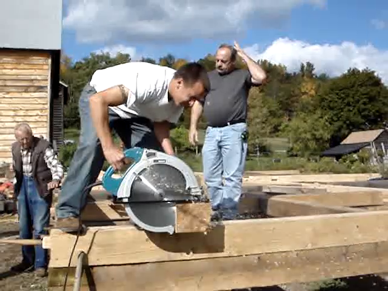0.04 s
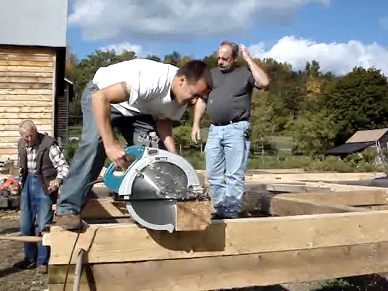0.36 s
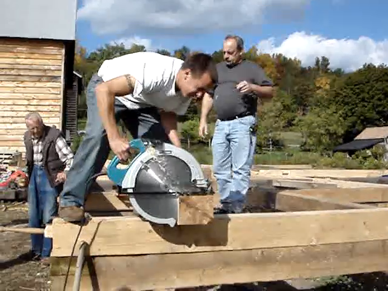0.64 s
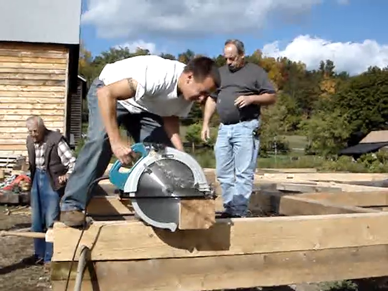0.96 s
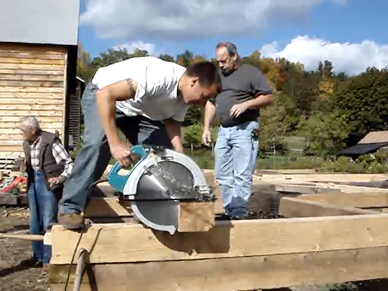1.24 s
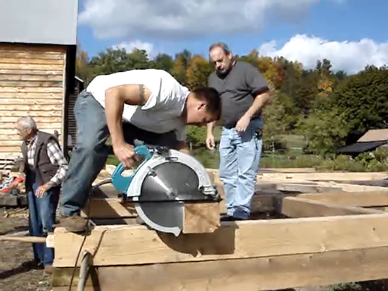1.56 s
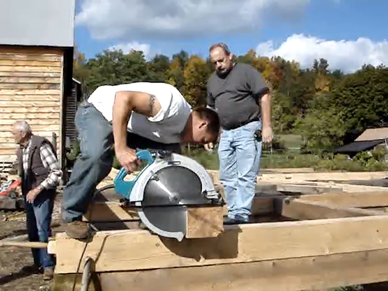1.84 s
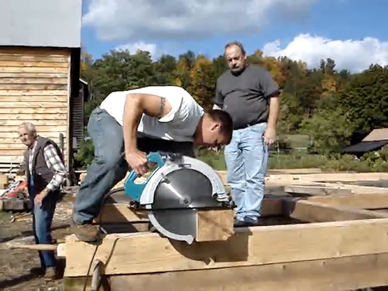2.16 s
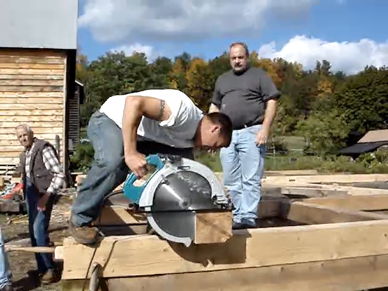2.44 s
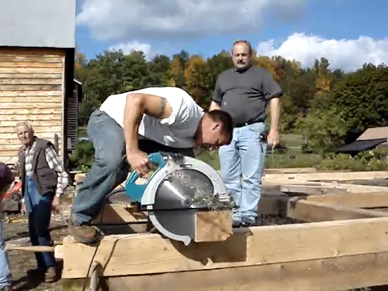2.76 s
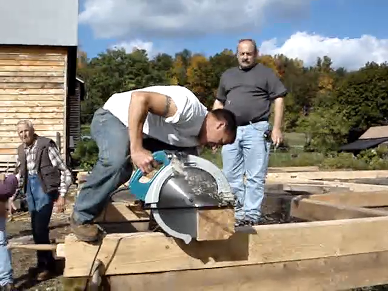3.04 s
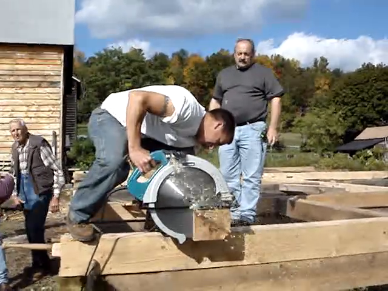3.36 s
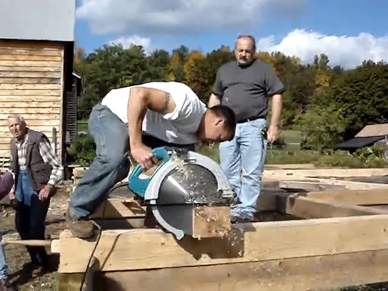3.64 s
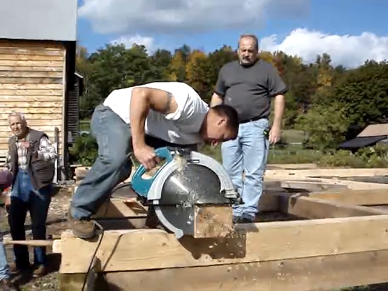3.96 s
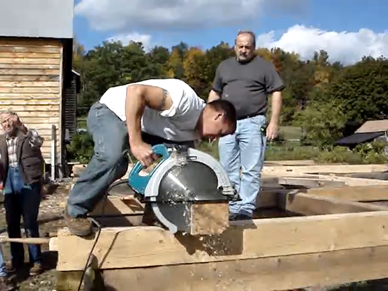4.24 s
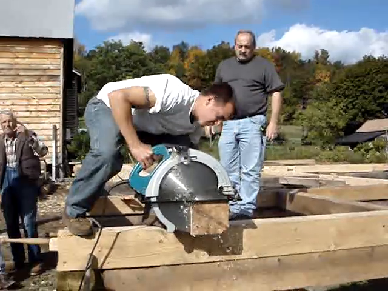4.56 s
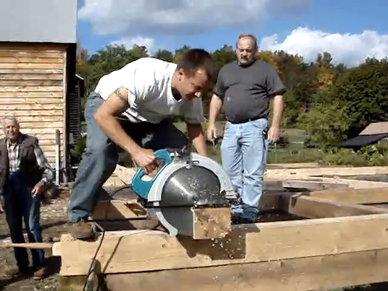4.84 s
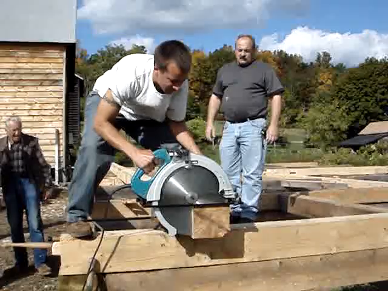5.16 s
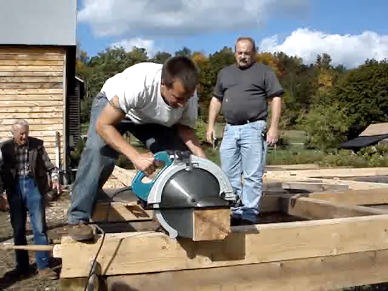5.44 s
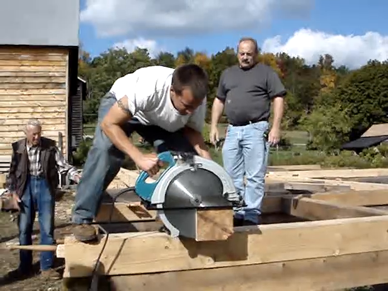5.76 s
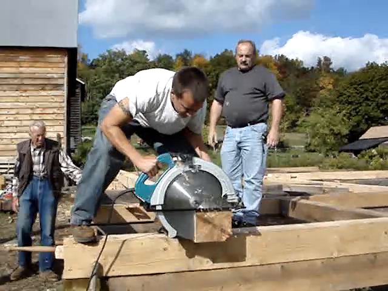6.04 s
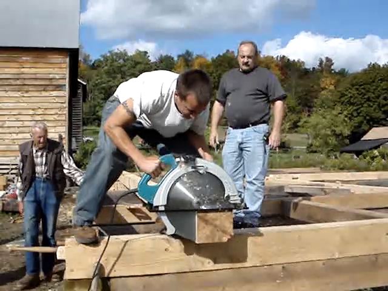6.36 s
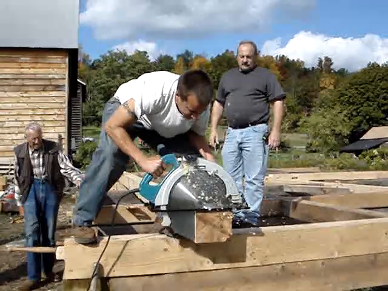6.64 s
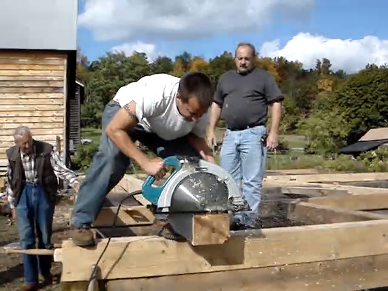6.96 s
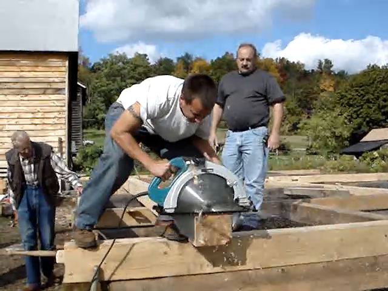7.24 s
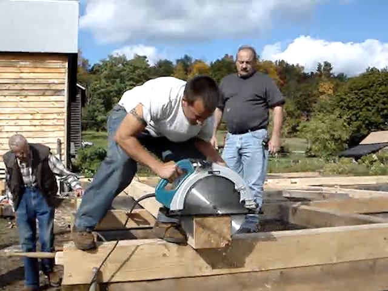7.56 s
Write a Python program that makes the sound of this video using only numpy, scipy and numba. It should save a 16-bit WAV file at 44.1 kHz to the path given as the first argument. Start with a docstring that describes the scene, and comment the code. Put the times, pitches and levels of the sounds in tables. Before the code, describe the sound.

A large circular saw cuts through a thick timber beam outdoors, a few metres from the microphone. Its motor whine sags and recovers several times over a loud roar, with tearing wood, hissing teeth and a ringing blade. Midway the motor labours with a buzzing hum, speeds up, then slows again. Brief whistles and rasps come through, and wind bumps the microphone, mostly early on.

```python
"""A big circular saw whines and roars through a timber beam, outdoors, a few metres away.
Its mains motor sags as the teeth bite; gears and fan whine, torque pulses throb in the beam.
The teeth tear and hiss, the blade rings, the saw briefly whistles and rasps. Gusts bump the microphone.
Later the air in the slot rings, mostly lower as the cut deepens."""
import sys
import numpy as np
from scipy import signal
from scipy.fft import rfft, irfft
from scipy.io import wavfile
from scipy.ndimage import uniform_filter1d
from numba import njit

SR = 44100
rng = np.random.default_rng(int(sys.argv[2]) if len(sys.argv) > 2 else 0)


def put_to_file(sound):
    """Save the sound as 16-bit audio at rate SR, in the file named by the first command-line argument."""
    columns = np.atleast_2d(sound).T  # one column per channel
    safe = np.clip(columns, -1, 1)
    whole_steps = np.round(safe * 32767)
    wavfile.write(sys.argv[1], SR, whole_steps.astype(np.int16))


N = 335160
TIME, FREQ = np.arange(N) / SR, np.fft.rfftfreq(N, 1 / SR)
MAINS_HZ = 60
TORQUE_HZ = 2 * MAINS_HZ

# Table levels are relative; each source adds its own gain.
ARMATURE_SPEED = [(0.0, 414.8), (0.15, 413.1), (0.62, 387.5), (1.04, 352.0), (1.24, 327.4), (1.37, 320.2),
                  (1.67, 327.1), (2.1, 360.5), (2.38, 360.8), (2.93, 286.9), (3.09, 282.2), (3.71, 269.3),
                  (4.06, 243.8), (4.32, 258.5), (4.65, 260.1), (4.9, 300.0), (5.5, 355.0), (5.69, 351.0),
                  (5.98, 333.5), (6.36, 337.5), (6.67, 319.4), (6.91, 288.6), (7.44, 263.7), (7.6, 258.5)]  # sags at each push: t/s, speed/Hz
MOTOR_LABOUR = [(3.45, 0.01), (3.75, .55), (4.02, .86), (4.25, .98), (4.55, .9), (4.7, 0.4), (5.1, .2)]  # t/s, labour/0-1
# gear case resonances: f/Hz, width/Hz, lift/dB
GEAR_CASE_PEAKS = [(988, 33, 7), (1278, 194, 10.5), (1409, 56, 11.5), (2867, 90, 12.5), (3160, 160, 9)]
# housing resonances: f/Hz, width/Hz, lift/dB
HOUSING_PEAKS = [(2470, 210, 2.5), (2683, 71, 7), (3080, 220, 3), (4700, 120, 4), (4930, 110, 3.5),
                 (7100, 220, 5)]
# armature, fan and tooth tones: multiple of armature speed, level/dB
WHINE_TONES = [(3, -48), (4, -48), (6, -52), (7.5, -56), (8, -51), (9, -51), (10, -49.5), (10.5, -50),
               (11, -47), (11.5, -46), (11.75, -50), (12, -44), (13, -51), (13.75, -54), (14, -47.5),
               (15, -50), (16, -45), (17, -50), (18, -45), (20, -46)]
# blade binds, one tone swells: t/s, sigma/s, multiple of armature speed, level/dB
BIND_SWELLS = [(.53, .11, 12, -28), (.9, .06, 16, -33), (2.22, .12, 13.75, -33), (.58, .06, 18, -34),
               (1.2, .07, 16, -35), (1.84, .07, 18, -32), (2.3, .2, 14, -36), (2.87, .05, 18, -32),
               (2.92, .07, 14, -34), (3, .13, 12, -31), (3.2, .13, 10, -37), (3.22, .09, 16, -30),
               (3.45, .08, 15, -33), (3.45, .12, 9, -39), (3.48, .11, 18, -28.5), (3.63, .08, 16, -30),
               (3.7, .1, 14, -32), (3.78, .08, 10, -36), (3.92, .09, 12, -26.5), (4.28, .06, 10, -31.5),
               (4.33, .13, 14, -34.5), (4.45, .08, 16, -35), (4.71, .05, 10, -33), (4.75, .12, 7.5, -39),
               (4.8, .1, 8, -38), (4.86, .11, 12, -34), (4.92, .06, 11, -34), (5.1, .08, 10, -33.5),
               (5.2, .14, 10.5, -36), (5.3, .14, 11.5, -32), (5.33, .08, 11.75, -34),
               (5.44, .07, 10, -30.5), (5.7, .12, 16, -37), (5.88, .08, 11.5, -33), (6.15, .1, 18, -35),
               (6.25, .18, 14, -34), (6.3, .2, 8, -36), (6.42, .12, 16, -32), (6.7, .05, 16, -35),
               (6.72, .12, 6, -36), (6.76, .08, 8, -30.5), (6.9, .05, 12, -33), (7, .12, 11, -35),
               (7.45, .16, 4, -34)]
# whine roughens as the blade sinks in: t/s, noise share/0-1
WHINE_ROUGHNESS = [(2.4, .02), (4.6, .04), (6.2, .1), (6.6, .25)]
# motor hum: multiple of mains, level/dB, extra at full labour/dB
HUM_HARMONICS = [(4, -12, -1), (6, -9.5, 1), (8, -4, 2), (10, -1.5, -1), (12, -9.5, 2), (14, -20, 12),
                 (16, -16, 11), (18, -16, 17), (20, -15, 19.5), (22, -19, 12)]

# spectra: f/Hz, level/dB
KNOCK_SPECTRUM = [(150, -43.5), (260, -16), (350, -12), (420, -1.5), (540, -0.5), (640, 0.5), (760, -6.5),
                  (900, -5.5), (2000, -58.5)]  # saw on beam
ROAR_SPECTRUM = [(120, -43), (250, -29), (340, -20.5), (430, -10.5), (570, -1), (730, -8), (880, -1.5),
                 (1010, -5.5), (1130, -13), (1390, -6.5), (1700, -14), (2500, -19), (6000, -76.5)]  # beam
GRIND_SPECTRUM = [(600, -30), (850, -5), (1050, 0), (1250, -3), (1600, -22), (3000, -60)]  # labouring saw
TEAR_SPECTRUM = [(500, -14), (1100, 1.5), (1500, 4.5), (1850, 3), (2100, 8), (2350, 2.5), (2700, 2.5),
                 (3300, 7), (4000, 5), (5000, -29.5), (9000, -54)]  # fibres
HISS_SPECTRUM = [(1000, -32), (2500, -25.5), (3400, -15.5), (4300, -4.5), (5000, -7), (5700, 0), (6500, -3),
                 (7300, -4.5), (8300, -9), (9300, -12.5), (10200, -25)]  # teeth
WIND_SPECTRUM = [(15, -19.5), (40, 3), (80, 6), (160, 4), (280, 8.5), (500, -0.5), (1000, -51), (2500, -62)]  # rumble on the microphone
DEEP_SPECTRUM = [(15, -16), (55, 1), (100, -5), (300, -53)]  # strong gusts
BUFFET_SPECTRUM = [(25, -49), (100, -3.5), (200, -2), (450, -2.5), (900, -5), (2200, -20), (6000, -51)]

# envelopes: t/s, level/dB
ROAR_ENVELOPE = [(.06, -19), (.48, -18), (.86, -22), (1.02, -25.5), (1.3, -23), (1.66, -21), (1.75, -27.5),
                 (2.45, -25.5), (2.8, -31), (3.4, -32.5), (3.82, -24.5), (4.3, -20.5), (4.9, -22),
                 (5.55, -21.5), (6.35, -24), (6.6, -27), (7.15, -25), (7.6, -25.5)]  # beam
TEAR_ENVELOPE = [(.06, -34), (.37, -37.5), (.55, -32.5), (.88, -28.5), (1.66, -28), (1.77, -36),
                 (1.95, -28.5), (2.25, -27.5), (2.8, -33.5), (3.4, -31.5), (3.82, -25.5), (4.5, -28),
                 (5.5, -25), (6.4, -27), (6.85, -24), (7.25, -25.5), (7.6, -30.5)]  # fibres
HISS_ENVELOPE = [(.06, -35.5), (0.351, -33), (.45, -27), (1.05, -25), (1.35, -28), (1.7, -25.5), (2.2, -26),
                 (2.6, -24.5), (3.2, -27.5), (4.2, -27.5), (5.35, -28.5), (5.9, -26.5), (6.15, -28),
                 (6.45, -26.5), (7.0, -27), (7.6, -24.5)]  # teeth
BREEZE_ENVELOPE = [(.06, -27), (.45, -28.5), (1.1, -46), (1.8, -39), (2.3, -41.5), (3.0, -51.5), (3.6, -47),
                   (4.1, -88), (4.55, -70), (5.05, -42.5), (5.7, -56), (6.25, -45), (6.95, -52.5),
                   (7.6, -49)]  # wind between gusts

# blade and guard resonances: f/Hz, width/Hz, lift/dB
STEEL_PEAKS = [(2520, 160, 4), (3080, 230, 4), (3450, 120, 3.5), (3640, 90, 4), (4140, 130, 6),
               (4700, 260, 7), (4950, 110, 6), (5230, 330, 6.5), (5570, 90, 3), (6000, 490, 2.5),
               (6840, 220, 1.5)]
# modes of the spinning blade: f/Hz, level/dB
BLADE_MODES = [(1004, -43), (2686, -48), (3446, -48), (3633, -46), (4148, -44), (4735, -44), (4938, -43),
               (5570, -44)]
# wind gusts: t/s, buffet sigma/s, rumble level/dB, buffet level/dB
WIND_GUSTS = [(0.185, 0.024, -18.5, -40), (0.266, 0.044, -16, -30), (0.484, 0.012, -20, -33),
              (0.643, 0.019, -27, -24.5), (0.777, 0.03, -35, -39), (1.344, 0.027, -26.5, -34),
              (1.51, 0.043, -31, -54), (1.567, 0.008, -25, -19.5), (1.681, 0.011, -26, -52),
              (1.8, 0.016, -29.5, -36), (1.92, 0.017, -43, -39), (2.102, 0.011, -26, -19.5),
              (2.154, 0.014, -31, -35), (2.493, 0.017, -44, -35), (2.59, 0.022, -43, -29.5),
              (3.235, 0.029, -48, -25), (3.55, 0.018, -50, -32), (4.68, 0.023, -36, -28.5),
              (4.915, 0.024, -36, -56), (5.01, 0.011, -36, -57), (5.414, 0.0097, -36, -30),
              (6.157, 0.073, -36.5, -69), (6.345, 0.017, -42, -36), (6.51, .012, -42, -64),
              (6.598, .01, -41, -48)]
# brief whistles and rasps of the saw: t/s, length/s, f/Hz, width/Hz, level/dB
SAW_WHISTLES = [(0.35, 0.42, 1008, 31, -14.5), (0.47, 0.11, 1400, 21, -16), (0.858, 0.11, 1402, 47, -14.5),
                (.7, .35, 5530, 12, -17.5), (.96, .08, 4675, 12, -17), (1.2, .14, 5480, 12, -16),
                (1.8, .09, 4730, 14, -21), (2.08, 0.17, 4700, 10, -17), (1.832, 0.089, 6140, 83, -11),
                (1.88, 0.38, 6620, 140, -16), (2.4, 0.27, 4770, 12, -19), (2.688, 0.18, 4880, 400, -7.5),
                (2.807, 0.07, 3540, 240, -12), (2.952, 0.071, 3270, 240, -11.5),
                (3.32, .06, 5750, 200, -11), (3.86, 0.091, 3380, 190, -9.5), (4.115, .14, 6180, 260, -14),
                (4.445, 0.26, 5180, 120, -14), (4.986, 0.11, 3600, 13, -12.5),
                (5.323, 0.18, 3625, 22, -16.5), (5.32, 0.13, 3960, 110, -23), (5.79, 0.21, 6880, 55, -16),
                (6.3, 1, 1003, 10, -22.5), (6.683, 0.61, 5080, 520, -10), (7.08, 0.084, 3090, 23, -15),
                (7.125, 0.11, 5300, 52, -13), (7.374, .092, 6960, 70, -17), (7.53, 0.088, 7460, 70, -19)]
# air resonance of the slot: t/s, f/Hz, level/dB
SLOT_RESONANCE = [(2.4, 9300, -47), (2.65, 8800, -33), (2.9, 8000, -29.5), (3.4, 4970, -24),
                  (3.68, 4450, -29.5), (3.9, 3570, -25.5), (4.1, 2800, -39), (4.55, 2430, -34),
                  (4.93, 3300, -27), (5.12, 3560, -37), (5.35, 3800, -27.5), (5.57, 4050, -30),
                  (5.9, 3760, -27), (6.15, 3420, -29.5), (6.8, 2490, -35), (7.6, 1930, -38.5)]


def amp(db):
    """Decibels to gain."""
    return 10 ** (np.asarray(db) / 20)


def unit(x):
    """Scale to rms 1."""
    return x / np.sqrt(np.mean(x ** 2) + 1e-20)


def curves(rows):
    """Columns of a time table, interpolated per sample."""
    times_s, *columns = np.transpose(rows)
    return [np.interp(TIME, times_s, column) for column in columns]


def bell(at_s, sigma_s):
    """Gaussian rise and fall."""
    return np.exp(-.5 * ((TIME - at_s) / sigma_s) ** 2)


def peaks_db(hz, peaks):
    """Summed lift of resonances at hz."""
    return sum(db / (1 + (2 * (hz - centre_hz) / width_hz) ** 2) for centre_hz, width_hz, db in peaks)


def colour(x, spectrum, extra_db=0):
    """Filter by a spectrum; rms 1."""
    hz, db = np.transpose(spectrum)
    shape_db = np.interp(np.log(FREQ + 1), np.log(hz), db)
    return unit(irfft(rfft(x) * amp(shape_db + extra_db), N))


def noise():
    """White noise."""
    return rng.standard_normal(N)


def drift(rate_hz):
    """Random wander up to about rate_hz; rms 1."""
    knots = rng.standard_normal(N // 64)
    lowpass = np.exp(-(np.fft.rfftfreq(len(knots), 64 / SR) / rate_hz) ** 2)
    smooth = unit(irfft(rfft(knots) * lowpass, len(knots)))
    return np.interp(np.arange(N), 64 * np.arange(len(knots)), smooth)


def tone(turns):
    """Sine of random phase; rms 1."""
    return np.sqrt(2) * np.sin(2 * np.pi * (turns + rng.random()))


def pattern(turns, harmonics, size=8192):
    """Random shape repeating at each turn of a shaft."""
    lines = np.exp(2j * np.pi * rng.random(harmonics)) * (1 + rng.random(harmonics))
    shape = unit(irfft(np.r_[0, lines], size))
    return np.interp(turns * size, np.arange(size), shape, period=size)


def speed_hz(inertia_s=.19):
    """Armature speed, smoothed by blade inertia."""
    return uniform_filter1d(curves(ARMATURE_SPEED)[0], round(inertia_s * SR), mode="nearest")


def armature():
    """Armature turns, jostled by the grain and shaken by torque pulses."""
    jostled_hz = speed_hz() * (1 + .0011 * drift(25))
    return np.cumsum(jostled_hz) / SR + .004 * np.sin(2 * np.pi * TORQUE_HZ * TIME)


def throb(depth):
    """Torque pulses twice per mains cycle."""
    return unit(1 + depth * np.cos(2 * np.pi * TORQUE_HZ * TIME))


def gearbox(turns, mesh_multiple=3.87, upper_multiple=8.85, flutter_db=2, shake_turns=.15):
    """Gears whine with load; torque pulses split each tone into lines that the case resonances lift."""
    load_db = (curves(TEAR_ENVELOPE)[0] + curves(ROAR_ENVELOPE)[0]) / 2
    load_db -= load_db.mean()
    shake = shake_turns * np.cos(2 * np.pi * TORQUE_HZ * TIME)
    tones = [(mesh_multiple, -44.5 + load_db),
             (2 * mesh_multiple, -48 + 3.3 * load_db),
             (upper_multiple, -45 + load_db)]
    gears = sum(amp(db + flutter_db * drift(9.1)) * tone(k * turns + shake) for k, db in tones)
    return irfft(rfft(gears * throb(.1)) * amp(peaks_db(FREQ, GEAR_CASE_PEAKS)), N)


def whine(turns, gain_db=1, flutter_db=2.6):
    """Fan, armature and tooth tones rise with the bite, on housing resonances and as the blade binds."""
    (hiss_db,), (rough,) = curves(HISS_ENVELOPE), curves(WHINE_ROUGHNESS)
    armature_hz = speed_hz()
    bite_db = .4 * (hiss_db - hiss_db.mean())
    out = np.zeros(N)
    for k, db in WHINE_TONES:
        steady = amp(db + bite_db + peaks_db(k * armature_hz, HOUSING_PEAKS) + flutter_db * drift(6))
        rub = np.sqrt(1 - rough) + np.sqrt(rough) * drift(90)
        swell = sum(amp(peak_db) * bell(at_s, sigma_s)
                    for at_s, sigma_s, multiple, peak_db in BIND_SWELLS if multiple == k)
        out += np.hypot(steady, swell) * rub * tone(k * turns)
    return amp(gain_db) * out


def hum(gain_db=-37.3, labour_db=-2.5, smear_turns=.0065):
    """Torque pulses buzz saw and beam at mains harmonics; grows with the roar, smeared by the wood."""
    (roar_db,), (labour,) = curves(ROAR_ENVELOPE), curves(MOTOR_LABOUR)
    lines = np.zeros(N)
    for k, db, extra_db in HUM_HARMONICS:
        turns = k * MAINS_HZ * TIME + .03 * drift(8) + smear_turns * (k - 10) ** 2
        lines += amp(db + extra_db * labour ** 2 + drift(5)) * np.cos(2 * np.pi * turns)
    level_db = gain_db + labour_db * labour + .7 * (roar_db - roar_db.mean())
    return amp(level_db) * np.sqrt(2) * lines


def knocking(turns, gain_db=-8.5, labour_db=-7, sigma_s=.0003):
    """Torque pulses knock saw on beam, the force varying with armature angle: a regular rasp."""
    (roar_db,), (labour,) = curves(ROAR_ENVELOPE), curves(MOTOR_LABOUR)
    lag_s = ((TORQUE_HZ * TIME + .5) % 1 - .5) / TORQUE_HZ
    pulses = np.exp(-.5 * (lag_s / sigma_s) ** 2)
    force = .3 * tone(turns) + .2 * tone(2 * turns) + drift(300)
    return amp(roar_db + gain_db + labour_db * labour) * colour(force * pulses, KNOCK_SPECTRUM)


def cutting(turns, roar_gain_db=-3, labour_db=-6, grind_db=-29.5, hiss_gain_db=3.5, repeat=.64):
    """Teeth strike wood: part repeats with the shafts, part is random splintering."""
    grain_db = -.24 * drift(2.2)  # hard and soft wood
    roar_db, tear_db, hiss_db = [curves(envelope)[0] + grain_db
                                 for envelope in (ROAR_ENVELOPE, TEAR_ENVELOPE, HISS_ENVELOPE)]
    labour, = curves(MOTOR_LABOUR)
    layshaft, blade = turns / 4, turns / 8
    bite = unit(1 + .14 * pattern(layshaft, 4) + .039 * pattern(blade, 9) + .097 * drift(73))
    rattle = (noise() + .3 * pattern(blade, 50)) * throb(.22 + .05 * labour)
    fibres = noise() * amp(1.2 * drift(500)) + .71 * repeat * pattern(layshaft, 110)
    chips = noise() * amp(.16 * drift(900)) + .75 * repeat * pattern(layshaft, 150)
    ring_db = peaks_db(FREQ, STEEL_PEAKS)
    roar = amp(roar_db + roar_gain_db + labour_db * labour) * colour(rattle, ROAR_SPECTRUM)
    grind = amp(grind_db) * labour ** 3 * colour(noise(), GRIND_SPECTRUM)
    tear = amp(tear_db) * colour(fibres * bite, TEAR_SPECTRUM, ring_db)
    hiss = amp(hiss_db + hiss_gain_db) * colour(chips * bite, HISS_SPECTRUM, ring_db)
    return roar + grind + tear + hiss


def flicker(x, patch_db=2.5, patch_hz=150, patch_s=.069, size=1024):
    """The treble flickers in random patches a few hundred hertz wide."""
    frames = dict(fs=SR, nperseg=size, noverlap=size * 3 // 4)
    hz, _, spectra = signal.stft(x, **frames)
    field = rng.standard_normal(spectra.shape[::-1]).T
    per_hz, per_s = np.fft.fftfreq(len(hz), hz[1]), np.fft.fftfreq(spectra.shape[1], size / 4 / SR)
    lowpass = np.exp(-2 * ((per_hz[:, None] * patch_hz) ** 2 + (per_s * patch_s) ** 2))
    patches = unit(np.fft.ifft2(np.fft.fft2(field) * lowpass).real)
    depth_db = patch_db * np.clip(hz / 3000, .3, 1)[:, None]
    gain = amp(depth_db * patches - depth_db ** 2 / 9)  # offset holds mean power
    return signal.istft(spectra * gain, **frames)[1][:N]


def blade_ring(width_hz=11, wander_db=2):
    """Teeth keep the blade ringing at its own modes, whatever the speed."""
    hiss_db, = curves(HISS_ENVELOPE)
    out = np.zeros(N)
    for hz, db in BLADE_MODES:
        shake = drift(width_hz) + 1j * drift(width_hz)
        out += amp(db + wander_db * drift(1.5)) * (shake * np.exp(2j * np.pi * hz * TIME)).real
    return out * amp(.27 * (hiss_db - hiss_db.mean()))


def wind(lumps_db=3, deep_db=-26, rumble_length_ratio=.66):
    """Lumpy rumble on the microphone; strong gusts reach deeper, sharp buffets higher."""
    breeze = amp(curves(BREEZE_ENVELOPE)[0] + lumps_db * drift(6.5))
    gusts = sum(amp(db) * bell(at_s, rumble_length_ratio * sigma_s)
                for at_s, sigma_s, db, _ in WIND_GUSTS)
    force = np.hypot(breeze, gusts)
    rumble = amp(.33 * drift(30)) * force * colour(noise(), WIND_SPECTRUM)
    deep = amp(deep_db) * (force / force.max()) ** 4.5 * colour(noise(), DEEP_SPECTRUM)
    buffets = sum(amp(db) * bell(at_s, sigma_s) for at_s, sigma_s, _, db in WIND_GUSTS)
    return rumble + deep + buffets * colour(noise(), BUFFET_SPECTRUM)


def whistles(half_rough_hz=40):
    """Brief gear and motor tone swells and blade squeals: narrow bands whistle, wide bands rasp."""
    out = np.zeros(N)
    for at_s, length_s, hz, width_hz, db in SAW_WHISTLES:
        near = abs(TIME - at_s) < 2 * length_s
        t = TIME[near]
        shake = (drift(width_hz) + 1j * drift(width_hz))[near]
        rough = width_hz ** 2 / (width_hz ** 2 + half_rough_hz ** 2)
        waver = np.sqrt(1 - rough) + np.sqrt(rough / 2) * shake
        envelope = .25 * amp(db) * np.exp(-2 * ((t - at_s) / length_s) ** 2)
        out[near] += envelope * (waver * np.exp(2j * np.pi * hz * t)).real
    return out


@njit
def resonate(x, hz, width_hz, sr):
    """Gliding resonance; two poles in series for steep skirts."""
    out, first, second = np.zeros(len(x)), 0j, 0j
    for i in range(len(x)):
        radius = np.exp(-np.pi * width_hz[i] / sr)
        pole = radius * np.exp(2j * np.pi * hz[i] / sr)
        first = pole * first + np.sqrt(1 - radius) * x[i]
        second = pole * second + (1 - radius) * first
        out[i] = second.real
    return out


def slot_air(turns, width_ratio=.23):
    """Tooth rasp rings the air in the slot, whose length changes as the blade goes through."""
    hz, db = curves(SLOT_RESONANCE)
    rasp = noise() + .85 * pattern(turns / 4, harmonics=130)
    return amp(db) * unit(resonate(rasp, hz, width_ratio * hz, SR))


def scene():
    """One near saw in open, windy air; both channels alike."""
    turns = armature()
    motor = gearbox(turns) + whine(turns) + hum() + knocking(turns)
    cut = flicker(cutting(turns) + slot_air(turns))
    mix = motor + cut + blade_ring() + whistles() + wind()
    return np.array([mix, mix])


def record(dry, start_s=.042, rise_s=.002, cutoff_hz=10130):
    """Abrupt start; steep low-pass."""
    gate = np.clip((TIME - start_s) / rise_s, 0, 1)
    lowpass = signal.firwin(601, cutoff_hz, window=("kaiser", 9), fs=SR)
    return signal.oaconvolve(dry * gate, lowpass[None], "same")


dry = scene()
out = record(dry)
put_to_file(out)
```